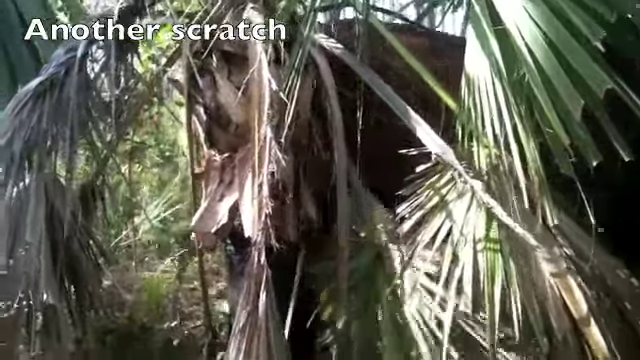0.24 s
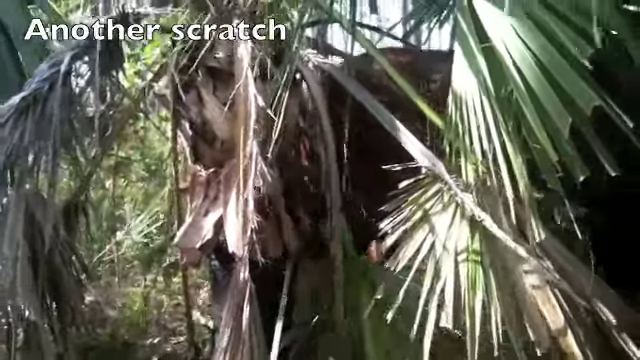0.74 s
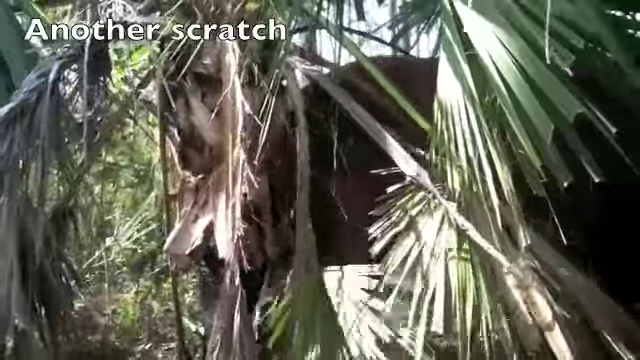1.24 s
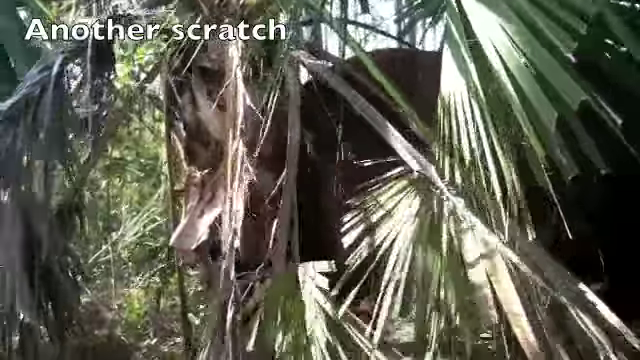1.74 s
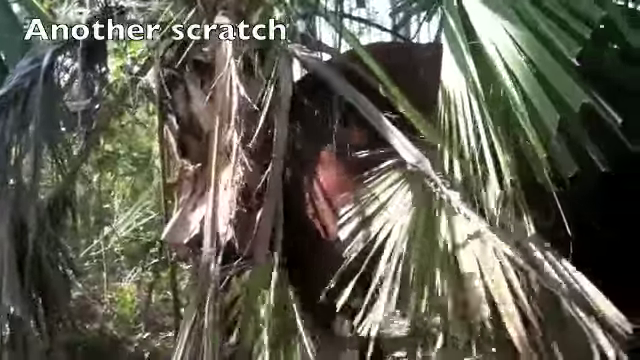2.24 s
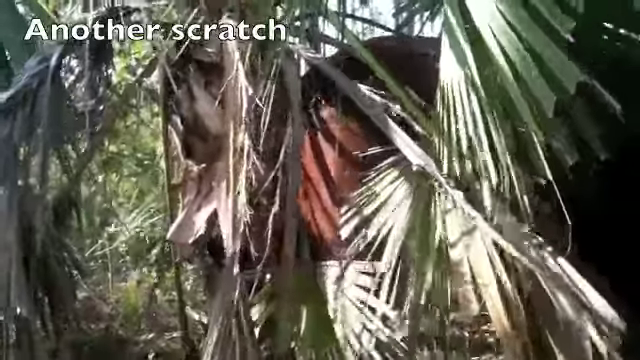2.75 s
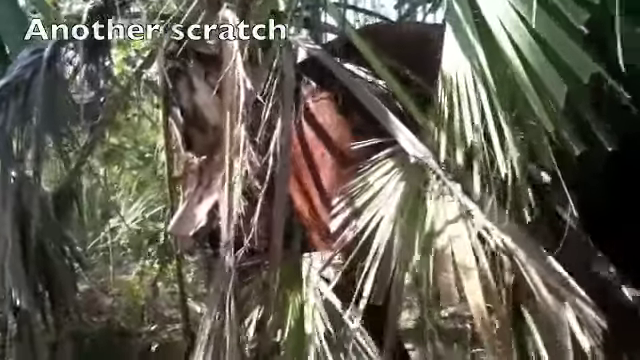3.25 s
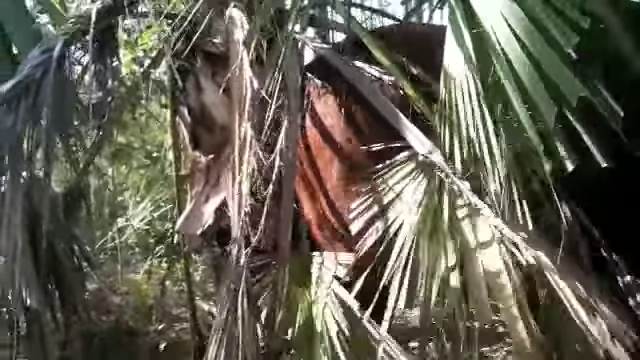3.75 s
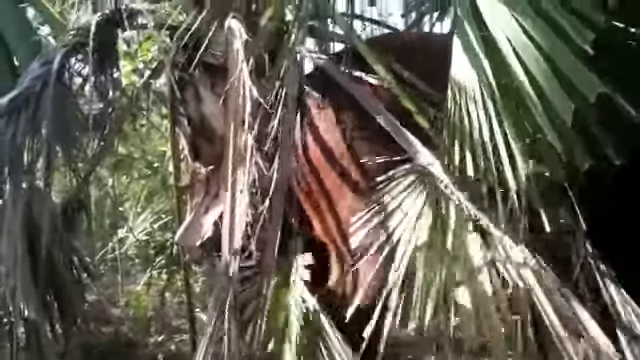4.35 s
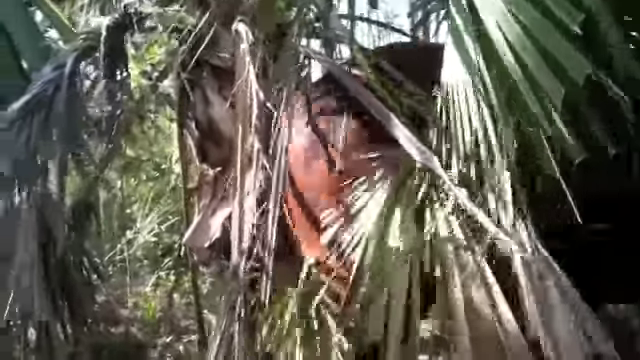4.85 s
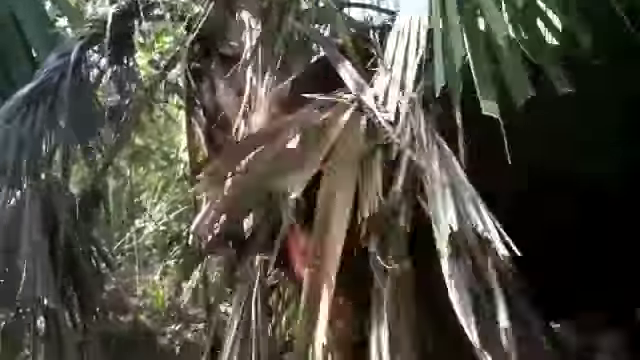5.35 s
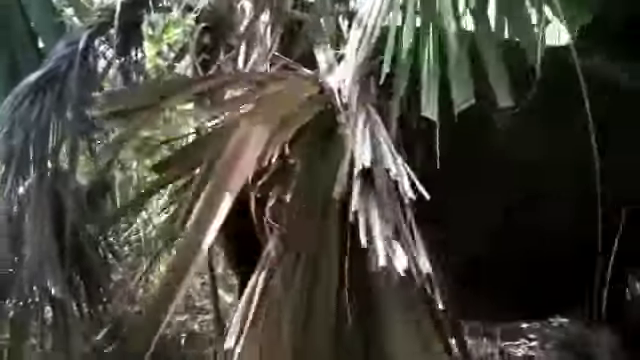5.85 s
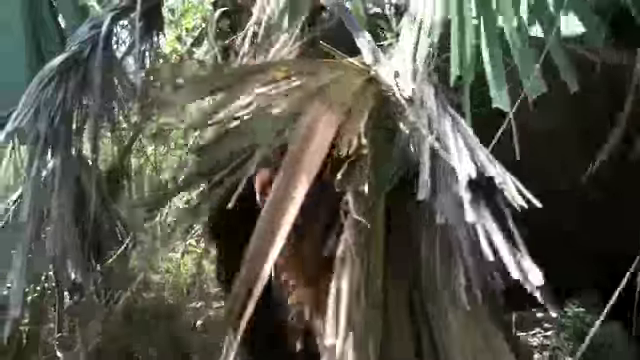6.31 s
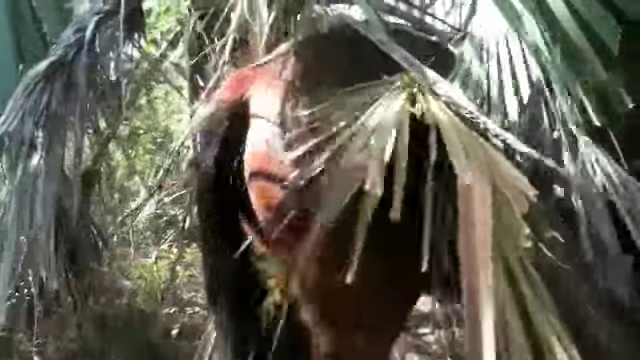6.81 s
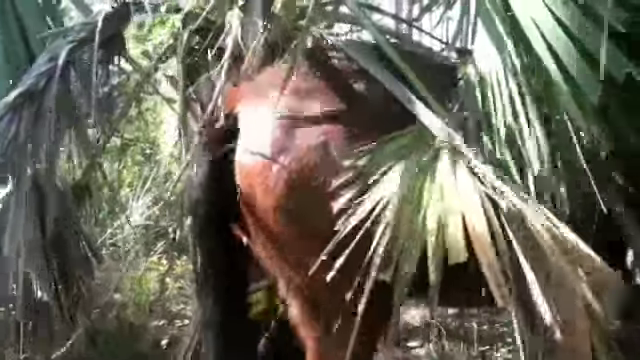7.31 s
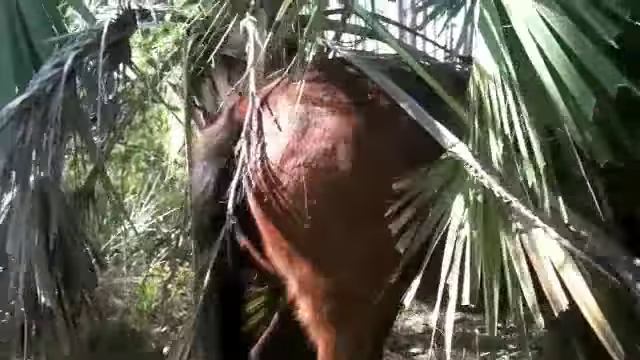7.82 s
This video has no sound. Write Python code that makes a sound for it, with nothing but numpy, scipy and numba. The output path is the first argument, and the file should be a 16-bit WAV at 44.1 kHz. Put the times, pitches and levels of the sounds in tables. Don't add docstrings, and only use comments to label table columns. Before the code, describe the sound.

Brittle palm leaves rustle, tick and snap sharply close by as a heavy animal pushes through them, with occasional dull stalk knocks.

```python
import sys
import numpy as np
from scipy import signal
from scipy.fft import rfft, irfft
from scipy.io import wavfile
from scipy.ndimage import uniform_filter1d
from numba import njit

SR = 44100
rng = np.random.default_rng(int(sys.argv[2]) if len(sys.argv) > 2 else 0)


def store_wav(level_fs):
    pcm = np.round(np.clip(np.atleast_2d(level_fs), -1, 1) * 32767)
    wavfile.write(sys.argv[1], SR, pcm.T.astype(np.int16))


def boost(x):
    u = np.asarray(x, float) / 20
    return 10 ** u


N = 356107


def level(x, db):
    return x * boost(db) / np.sqrt(np.mean(x ** 2))


def shape_db(table, hz):
    table_hz, table_db = np.transpose(table)
    return np.interp(np.log(hz), np.log(table_hz), table_db)


def colour(x, table):
    hz = np.maximum(np.linspace(0, SR / 2, 2049), 1)
    cepstrum = irfft(shape_db(table, hz) * np.log(10) / 20)
    cepstrum[1:2048] *= 2
    cepstrum[2049:] = 0
    impulse = irfft(np.exp(rfft(cepstrum)))
    return signal.fftconvolve(x, impulse)[:N]


@njit
def grains(length, start, hz, cycles, size, rise):
    out = np.zeros(length)
    for k in range(len(start)):
        turn = np.exp((2j * np.pi - np.log(1000.) / cycles[k]) * hz[k] / SR)
        soften = np.exp(-hz[k] / (rise * cycles[k] * SR))
        z, soft = size[k] + 0j, 1.
        end = min(int(start[k] + cycles[k] * SR / hz[k]), length)
        for i in range(max(int(start[k]), 0), end):
            out[i] += z.imag * (1 - soft)
            z, soft = z * turn, soft * soften
    return out


def strike(start_s, hz, cycles, size, rise):
    group = np.broadcast_arrays(np.asarray(start_s) * SR, hz, cycles, size)
    start, hz, cycles, size = [np.array(a, float).ravel() for a in group]
    return grains(N, start, hz, cycles, size, rise)


def random_sign(chance):
    return np.sign(chance - 0.5)


def walk(rate):
    hold = int(SR / rate)
    steps = rng.standard_normal(N // hold + 1)
    return uniform_filter1d(np.repeat(steps, hold), hold)[:N]


def slips(rate, fade_ms):
    kicks = (rng.random(N) < rate / SR) * rng.random(N)
    fade = np.exp(-1000 / (fade_ms * SR))
    saw = np.tanh(signal.lfilter([1], [1, -fade], kicks))
    return (saw - saw.mean()) / saw.std()


# pitch_hz [Hz], level_db [dB per Hz]
AIR_TONE = [(15, -61), (25, -31), (53, -16), (283, 3), (1470, -5), (2450, -3.5), (3210, -13), (4820, -1),
            (7620, -9), (12100, -11.5), (14600, -39), (15800, -55)]
# pitch_hz [Hz], level_db [dB]
CAMERA_WHINE = [
    (14970, -90),
    (15030, -94),
]


def air():
    breath_db = 2.0 * walk(3) + 1.05 * walk(12)
    out = level(colour(rng.standard_normal(N), AIR_TONE) * boost(breath_db), -60)
    t = np.arange(N) / SR
    for hz, db in CAMERA_WHINE:
        out += np.sqrt(2) * boost(db) * np.sin(2 * np.pi * hz * t + 1.5 * walk(30))
    return out


# start_s [s], peak_db [dB], ring_hz [Hz], t60_s (time to fade 60 dB) [s], slap_db [dB]
STALK_KNOCKS = [(0.118, -67, 269, 0.1, -38), (0.167, -39.5, 430, 0.053, -36), (0.221, -41, 309, 0.071, -35),
                (0.369, -45.5, 200, 0.056, -38), (0.616, -38.5, 253, 0.085, -38),
                (1.688, -73, 242, 0.1, -37), (2.581, -48.5, 269, 0.085, -58), (3.238, -56, 252, 0.18, -38),
                (3.414, -65, 493, 0.071, -31), (3.476, -51, 370, 0.062, -56),
                (3.797, -48.5, 305, 0.086, -48), (4.7, -46.5, 159, 0.08, -45),
                (4.772, -47.5, 210, 0.088, -35), (6.4, -52, 290, 0.048, -52), (6.628, -44, 261, 0.083, -38),
                (6.942, -48, 334, 0.066, -26)]


def knocks():
    s, peak_db, hz, t60, slap_db = np.transpose(STALK_KNOCKS)
    start = s + 0.003145
    cycles = t60 * hz
    ring = strike(start, hz, cycles, boost(peak_db + 4.5), 0.046)
    ring += strike(start, 0.654 * hz, 0.9 * cycles, boost(peak_db - 7.5), 0.029)
    ring += strike(start, 1.404 * hz, 1.6 * cycles, boost(peak_db - 3), 0.033)
    trunk_db = peak_db + 10 * np.log2(200 / hz) - 7.0
    ring += strike(start + 0.0055, 0.456 * hz, 0.88 * cycles, boost(trunk_db), 0.14)
    slap = strike(start + 15 / SR, 1400, 2.4, -boost(slap_db + 10.5), 0.093)
    for when, tone in rng.random((5, 2, len(s))):
        slap += strike(start + 150 * when / SR, 650 * 3.1 ** tone, 9.0, boost(slap_db - 1.5), 0.037)
    return ring + signal.sosfilt(signal.butter(2, 260, "highpass", fs=SR, output="sos"), slap)


# start_s [s], peak_db [dB], ring_hz [Hz]
BLADE_PLUCKS = [(0.1206, -35, 2140), (0.168, -37, 1780), (0.2226, -39, 1740), (1.0645, -44, 2850),
                (1.132, -25, 2470), (2.3955, -39.5, 1630), (2.806, -35, 2520), (3.4142, -29, 2300),
                (4.2725, -42, 2480), (4.4877, -31, 2620), (4.7774, -29, 2390), (4.9033, -33, 1740),
                (4.9707, -32, 2520), (5.2101, -29.5, 2060), (5.2659, -33, 2830), (5.3033, -30, 2310),
                (5.3584, -25.5, 2450), (5.3986, -35, 2690), (5.6123, -22, 2150), (5.654, -21, 2610),
                (5.6888, -24, 2620), (5.724, -31, 2570), (5.9654, -24, 3400), (5.971, -33, 3000),
                (6.225, -37, 2620), (6.3185, -36, 3160), (6.613, -28.5, 2330), (6.7979, -36, 1630),
                (6.9441, -37, 2250), (6.998, -28.5, 2370), (7.0359, -32, 2340), (7.1157, -28, 2130),
                (7.1571, -32, 2400), (7.2459, -28, 3300), (7.2457, -25, 2150), (7.3976, -28, 2310),
                (7.5108, -30, 3150), (7.636, -30.5, 2800), (7.6939, -35, 2100), (7.7495, -28, 2260),
                (7.8496, -35, 2700)]


def plucks(count=6):
    s, peak_db, hz = np.transpose(BLADE_PLUCKS)[:, :, None]
    when, tone, softer, sign = rng.random((4, len(s), count))
    flap = np.arange(count)
    late = 0.012 * ((flap + when) / count) ** 1.5
    pitch = hz * (1 + 0.42 * (tone - 0.5) * flap / count)
    size = random_sign(sign) * boost(peak_db - 1.0 - 880 * late - 6.9 * softer)
    return strike(s + late + 0.00047, pitch, 28., size, 0.011)


# start_s [s], peak_db [dB]
TIP_SPLITS = [(0.5945, -35), (1.3768, -31), (1.487, -24), (2.1226, -33), (2.7876, -31), (2.806, -25),
              (2.9407, -28), (3.054, -31), (3.1507, -37), (3.2425, -33), (3.2425, -29), (3.3468, -32),
              (4.2727, -38), (4.3251, -36), (4.577, -32), (4.5887, -17), (4.784, -32), (4.784, -28),
              (4.9317, -28), (5.1462, -29), (5.2091, -28), (5.2096, -21), (5.2415, -27), (5.2659, -25),
              (5.3283, -29), (5.3762, -34), (5.5199, -23), (5.5782, -33), (5.6176, -27), (5.655, -13),
              (5.7573, -17), (5.9643, -31), (6.3185, -38), (6.3704, -33), (6.544, -31), (6.6578, -27),
              (6.8219, -22), (7.0359, -25), (7.1716, -28), (7.244, -22), (7.3228, -26), (7.4081, -26),
              (7.5108, -23), (7.7019, -32), (7.7019, -27), (7.7278, -29), (7.8496, -35), (7.9079, -31),
              (7.9977, -36)]


def splits(count=5):
    s, peak_db = np.transpose(TIP_SPLITS)[:, :, None]
    when, tone, sign = rng.random((3, len(s), count))
    late = 0.0067 * ((np.arange(count) + when) / count) ** 3.2
    size = random_sign(sign) * boost(peak_db - 4.5 - 880 * late)
    return strike(s + late + 0.0003, 8600 + 4600 * tone, 30., size, 0.015)


# peak_s [s], level_db [dB], ring_hz [Hz], blade_db (share of the blade) [dB]
LEAFLET_CRACKS = [(0.157, -22.5, 6200, -12), (.224, -23, 5850, -6), (0.619, -19.5, 7120, -10),
                  (0.806, -30, 6560, -19), (2.096, -36, 6900, -20), (2.124, -29.5, 6800, -25),
                  (2.808, -21.5, 7300, -26), (2.943, -18, 6250, -15), (3.146, -20, 6010, -32),
                  (3.3985, -22.5, 6440, -30), (2.477, -30, 6900, -22), (3.495, -29.5, 5640, -3),
                  (4.3269, -20.5, 6650, -23), (4.5911, -18, 7470, -8), (5.2109, -20, 6400, -8),
                  (7.511, -24, 6020, -22), (5.2434, -20, 7770, -24), (5.522, -20.5, 5040, -13),
                  (2.7168, -24, 6540, -8.5), (5.7699, -26, 5660, -6), (5.9666, -20, 4730, -19),
                  (6.3190, -22, 7200, -10), (6.5765, -21.5, 5400, -20), (6.8374, -25.5, 5030, -2.5),
                  (6.929, -25, 6160, -4), (7.2476, -11.5, 7050, -8), (7.41, -21, 5880, -7),
                  (7.434, -23, 6400, -4), (7.638, -28.5, 5650, -5), (7.751, -21, 7000, -1.5)]
# peak_s [s], level_db [dB], ring_hz [Hz], blade_db [dB]
LEAFLET_SHAKES = [(0.598, -23.5, 6650, -25), (0.733, -33, 6150, 1), (1.067, -37.5, 6620, 12),
                  (1.1338, -23.5, 6060, -17), (1.353, -24, 6060, -13), (1.382, -21.5, 6850, -6.5),
                  (1.489, -27, 7400, -20), (2.3977, -29.5, 6370, -3.5), (2.7818, -26, 6400, -25),
                  (3.0686, -29.5, 6000, -3), (3.5704, -29.5, 6340, -7), (4.2741, -31, 6400, 3.5),
                  (4.578, -26, 6400, -7), (4.786, -21.5, 6720, -1.5), (4.933, -24, 6800, -19),
                  (5.1493, -27, 6740, -16), (5.199, -29, 6200, -15), (5.2847, -29, 6990, -8),
                  (5.3586, -24, 5420, -7), (5.403, -26.5, 6730, -19), (5.5812, -23, 7350, -27),
                  (5.614, -21.5, 4850, -18), (6.228, -34, 6450, 0), (6.6645, -27, 6500, -18),
                  (6.6957, -28, 6040, -17), (6.745, -25.5, 6900, -31), (6.946, -33, 5910, 7),
                  (7.037, -27.5, 6260, -7), (7.087, -28, 6230, -0.5), (7.324, -20, 7040, -6)]
# peak_s [s], level_db [dB], ring_hz [Hz], swell_ms
# [ms], rattle_ms [ms]
LEAFLET_TEARS = [(0.649, -25, 6550, 12, 20), (2.239, -26, 5370, 9, 12), (2.4266, -27, 6300, 4.1, 14.7),
                 (3.4164, -14, 5900, 2.6, 3.8), (5.6558, -16, 7460, 2.5, 4), (3.18, -23, 5600, 9.9, 22),
                 (3.255, -22.5, 6400, 16.2, 19.3), (3.4772, -23, 6820, 4.7, 6.3),
                 (3.615, -26, 6500, 4.8, 13.6), (4.49, -27, 6000, 25, 17), (4.8086, -21.5, 6400, 11, 19),
                 (4.9051, -16.5, 6430, 6.2, 5.9), (5.332, -24.5, 5300, 5.2, 7.1),
                 (5.692, -21, 6400, 7.5, 9), (5.7595, -17.5, 5400, 9, 4.1), (6.078, -36, 6750, 12, 11.4),
                 (6.2042, -29.5, 7100, 12.7, 20.4), (6.2634, -29.5, 5000, 10, 12),
                 (6.3777, -27.5, 6000, 4.8, 6.6), (6.616, -24.5, 5940, 4.5, 12),
                 (6.803, -21.5, 5000, 6.3, 3.4), (6.86, -24.5, 6400, 6.4, 8.9),
                 (7.123, -20, 6000, 6.2, 5.5), (7.1757, -19, 7140, 4.2, 19), (5.222, -20, 7700, 1.9, 2.8),
                 (7.7032, -18.5, 7100, 6.4, 6), (7.7374, -28.5, 6230, 11.6, 24),
                 (7.852, -28.5, 5750, 3.8, 2.9), (7.909, -30, 7140, 1.8, 7), (7.9547, -28, 6400, 5, 9)]
# peak_s [s], level_db [dB]
TIP_TICKS = [(0.0412, -30.5), (0.98, -33), (1.28, -30), (1.5307, -36), (2.19, -36), (2.4366, -39),
             (3.0305, -34.5), (3.2618, -19), (3.435, -26), (3.992, -42), (4.094, -32), (4.352, -28),
             (4.3793, -25.5), (5.258, -33), (5.7775, -30), (5.2678, -31), (6.0425, -43), (5.553, -34),
             (5.5989, -26), (6.163, -34), (6.8244, -36), (7.015, -24.5), (7.158, -32), (7.194, -26),
             (7.49, -31), (7.9986, -47)]
# peak_s [s], level_db [dB], ring_hz [Hz]
LEAFLET_FLICKS = [(0.168, -35, 6530), (0.2918, -32, 7510), (0.4525, -33, 5790), (0.611, -29, 7340),
                  (0.7453, -35, 5950), (0.7594, -24.5, 6160), (0.97, -33, 6050), (1.094, -32, 6580),
                  (1.1557, -27, 5930), (1.429, -25.0, 7410), (1.5031, -34, 5960), (1.5164, -35, 6630),
                  (1.6912, -33, 5740), (1.857, -37, 6540), (2.0283, -36, 6080), (2.113, -39, 5470),
                  (2.585, -30, 7110), (3.199, -33, 5000), (3.2376, -22, 6030), (3.3568, -22, 5540),
                  (3.4493, -25, 5800), (3.509, -33, 6050), (3.6506, -45, 5920), (3.7134, -38, 7400),
                  (3.899, -41, 8240), (3.946, -45, 5730), (3.962, -37, 5330), (4.2039, -42, 4880),
                  (4.307, -29, 5670), (4.508, -28, 7320), (4.7754, -27, 6270), (4.836, -26.0, 6810),
                  (4.8725, -27, 5660), (4.884, -25.0, 6370), (5.0281, -29, 6700), (5.1608, -34, 6450),
                  (5.3034, -27, 7820), (5.3778, -26.5, 8100), (5.6238, -23.5, 7060), (5.8387, -33.5, 7390),
                  (5.9096, -35, 5200), (5.929, -38, 5870), (5.9753, -24, 4500), (6.196, -35, 6570),
                  (6.3017, -34.5, 4000), (6.4704, -38, 6220), (6.5164, -31, 6800), (6.593, -31, 6660),
                  (6.7573, -44, 6560), (7.0013, -27, 6850), (7.0585, -26, 6010), (7.345, -22.0, 5670),
                  (7.4246, -25.0, 6800), (7.5548, -34, 6820), (7.6661, -36, 6170), (7.715, -30, 6870),
                  (7.7863, -38, 8320), (7.869, -37, 6120), (7.9447, -31, 6760), (7.9675, -36.0, 6540)]


def breaks():
    crack_swell_ms = 2.6
    rows = []
    for s, db, hz, blade_db in LEAFLET_CRACKS:
        rows.append((s, db, hz, blade_db, crack_swell_ms, 9 * (6500 / hz) ** 1.1))
    for s, db, hz, blade_db in LEAFLET_SHAKES:
        rows.append((s, db, hz, blade_db, 4.6, 16))
    for s, db, hz, swell_ms, rattle_ms in LEAFLET_TEARS:
        rows.append((s, db, hz, -10.5, swell_ms, rattle_ms))
    for s, db in TIP_TICKS:
        rows.append((s, db, 6160, -19, crack_swell_ms, 7))
    for s, db, hz in LEAFLET_FLICKS:
        rows.append((s, db, hz, -6.5, 5, 6))
    return rows


# pitch_hz [Hz], level_db [dB per Hz]
LEAFLET_TONE = [(65, -44.5), (110, -20.5), (263, -10.5), (345, -9.5), (399, -15.5), (729, -10.5),
                (897, -9.5), (1570, -13), (2430, -5.5), (3250, -8.5), (5820, -4.5), (7950, -4), (9790, -4),
                (12100, -13), (15800, -32)]


def snaps(count=72, splinters=7):
    s, peak_db, hz, blade_db, swell, rattle = np.transpose(breaks())[:, :, None]
    swell, rattle = np.clip(swell - 2.4, 0.05, 30), np.clip(rattle, 2, 21)
    when, tone, softer, spread, sign, crack_when, crack_tone = rng.random((7, len(s), count))
    sign = random_sign(sign)
    span = swell + 2.2 * rattle
    late = span * ((np.arange(count) + when) / count) ** 1.4 - swell
    size_db = peak_db + 10 * np.log10(span / count) + 7.5 - 15 * softer
    size_db -= np.where(late < 0, -7 * late / (swell + 0.11), 9 * late / rattle)
    start = s + (late - 1.1) / 1000
    pitch = np.clip(hz * 2 ** (2.34 * (tone - 0.42) * spread), 400, 15000)
    own_tone_db = shape_db(LEAFLET_TONE, hz)
    size = sign * boost(size_db - np.maximum(own_tone_db, shape_db(LEAFLET_TONE, pitch)))
    bright = strike(start, pitch, 20., size, 0.015)

    crack_when, crack_tone = crack_when[:, :splinters], crack_tone[:, :splinters]
    climb = ((np.arange(splinters) + crack_tone) / splinters) ** 1.7
    crack_hz = 0.908 * hz + (15000 - 0.81 * hz) * climb
    crack_db = peak_db + 0.3 + 9 * np.log2(hz / 7000) - 0.73 * swell
    crack_db = crack_db + (2.0 + 25 * np.log2(hz / 6600)) * np.log2(crack_hz / 6000)
    crack_at = s + (1.5 * crack_when - 1.15) / 1000
    bright += strike(crack_at, crack_hz, crack_hz / 330, sign[:, :splinters] * boost(crack_db), 0.083)

    own_hz = hz * (1 + 0.3 * (tone[:, :3] - 0.5))
    own_at = s + (3.0 * softer[:, :3] - 1.2) / 1000
    own_size = sign[:, :3] * boost(peak_db - 13.0 - own_tone_db)
    bright += strike(own_at, own_hz, own_hz * 0.015, own_size, 0.018)

    blade_hz = 800 * 3.72 ** spread[:, ::3] ** 0.65
    blade_size = (sign * boost(size_db + blade_db - 9.5))[:, ::3]
    low = strike(start[:, ::3], blade_hz, 11., blade_size, 0.018)
    return colour(bright, LEAFLET_TONE) + low


# time_s [s], scrape_db [dB]
FLANK_LEAN = [(0.0, -42), (0.3, -44.5), (0.78, -41.5), (0.9, -46), (1.5, -52), (1.75, -50.5), (2.11, -52),
              (2.3, -42.5), (2.78, -42.5), (2.9, -68), (3.5, -62), (3.93, -54.5), (4.74, -40.5), (5.5, -39),
              (5.9, -50.5), (6.9, -40), (7.6, -40), (7.85, -66)]
# start_s [s], hold_s [s], scrape_db [dB],
# blade_db (blade rattle against the scrape) [dB], load_db (extra load on the stalks) [dB]
RUB_STROKES = [(0.14, 0.19, -41, -14, -1), (0.365, 0.16, -39, -5.5, 1), (0.62, 0.13, -39.5, -7, 0.5),
               (1.061, 0.12, -36, -4, -0.5), (1.195, 0.25, -39, -9, 0.5), (1.372, 0.18, -37, -7.5, -1),
               (1.692, 0.008, -44, -3, -2), (2.807, 0.017, -44, -7.5, -1.5), (2.943, .005, -46, -12, 1.5),
               (3.077, 0.053, -41, -10, -2), (3.179, 0.24, -33.5, -10, -3), (3.562, 0.27, -45.5, -9, -2),
               (4.11, 0.032, -47, -14, -1), (4.33, 0.043, -36.5, -7, 1), (4.452, 0.061, -35.5, -2.5, 1.5),
               (4.798, 0.22, -38, -8, 2.5), (5.027, 0.079, -42.5, -11, 2), (5.236, 0.15, -48, -6, -6),
               (5.63, 0.03, -32, -5.5, -8), (5.684, 0.069, -43, -19, -2), (5.983, 0.0089, -48, -10, 6),
               (6.515, 0.19, -40, -7, -2.5), (7.175, 0.069, -40, -2, 2), (7.26, 0.095, -30.5, -2.5, 1),
               (7.414, 0.047, -40.5, -6, 3.5), (7.704, 0.043, -39.5, -4, 1), (7.888, 0.15, -47.5, -4.5, -7),
               (0.983, 0.018, -47.5, -20, 0), (6.19, 0.093, -52.5, 2.5, 5), (2.562, 0.03, -41.5, -12, 0)]


def rubbing():
    rise_db_s, fall_db_s, lean_blade_db = 240, 147, -6
    t = np.arange(N) / SR
    leaf = boost(np.interp(t, *np.transpose(FLANK_LEAN))) ** 2
    blade = leaf * boost(lean_blade_db) ** 2
    stalk = leaf
    for s, hold, db, blade_db, load_db in RUB_STROKES:
        rise_db = rise_db_s * np.clip(s - t, 0, 1)
        fall_db = fall_db_s * np.clip(t - s - hold, 0, 1)
        power = boost(db - rise_db - fall_db) ** 2
        leaf = leaf + power
        blade = blade + power * boost(blade_db) ** 2
        stalk = stalk + power * boost(load_db) ** 2
    scrape_db = 10 * np.log10(leaf)
    effort_db = scrape_db + 40
    stalk_db = -15.5 - 0.14 * effort_db + 10 * np.log10(stalk / leaf)
    tip_db = -13.5 + 0.067 * effort_db
    return scrape_db, 10 * np.log10(blade / leaf), stalk_db, tip_db


# time_s [s], rustle_hz (centre of their rustle) [Hz]
LEAFLET_WIDTH = [(0.0, 6400), (0.45, 5630), (0.75, 6460), (1.15, 6400), (1.5, 6550), (2.2, 6100),
                 (2.56, 6700), (3.15, 5900), (3.42, 6400), (4.3, 6500), (4.9, 6300), (5.3, 6500),
                 (5.6, 6700), (5.98, 5500), (6.2, 6200), (6.6, 6700), (7.3, 6750), (8.07, 6940)]


def ticks(db, lo_hz, hi_hz, cycles, spread_db, surge_db, count, leaning=0):
    middle_hz, tilt_db = 6400, 22
    when, pitch, strength, ring, sign = rng.random((count, 5)).T
    hz = lo_hz + pitch * (hi_hz - lo_hz)
    ring = cycles * (0.5 + ring)
    narrow = np.log2(np.interp(when * N / SR, *np.transpose(LEAFLET_WIDTH)) / middle_hz)
    size_db = leaning * tilt_db * narrow * np.log2(hz / middle_hz) - spread_db * np.log(1 - strength)
    size = random_sign(sign) * boost(size_db) * np.sqrt(hz / ring)
    swarm = grains(N, when * N, hz, ring, size, 0.037)
    surge = boost(surge_db * (walk(25) + walk(90)))
    return level(colour(swarm, LEAFLET_TONE) * surge, 0) * boost(db)


def crackle():
    scrape, blade = rubbing()[:2]
    stiff = ticks(scrape - 6.0, 4993, 8030, cycles=80, spread_db=1.8, surge_db=1.5, count=6000, leaning=1.2)
    wide = ticks(scrape + blade - 12.0, 899, 2905, cycles=36, spread_db=1.76, surge_db=1.5, count=3000)
    hairline = ticks(scrape - 11.0, 4000, 11000, cycles=3.0, spread_db=2.2, surge_db=1.0, count=2500)
    return stiff + wide + hairline


# time_s [s], jerk_share [0 to 1]
GRIP_JERK = [
    (0, 0.25),
    (1.6, 0.25),
    (2.4, 0.4),
    (4.5, 0.3),
    (5.3, 0.55),
    (8.07, 0.5),
]


def rustle():
    scrape, blade, stalk, tip = rubbing()
    grip = 0.5 * walk(15) + 1.6 * slips(70, 10) + 1.3 * walk(120)
    grip = grip * np.interp(np.arange(N) / SR, *np.transpose(GRIP_JERK))
    leaflets = ticks(scrape + grip - 3.0, 4020, 8450, cycles=11.2,
                     spread_db=0.5, surge_db=1.6, count=60000, leaning=0.79)
    blades = ticks(scrape + blade + 0.89 * grip - 6.0, 1400, 3990, cycles=23,
                   spread_db=1.5, surge_db=1.5, count=20000)
    stalks = ticks(scrape + stalk + 0.26 * grip - 2.0, 127.0, 1554, cycles=15.2,
                   spread_db=1.2, surge_db=1.66, count=9000)
    tips = ticks(scrape + tip + grip - 0.5, 10000, 15400, cycles=12.3,
                 spread_db=-0.5, surge_db=0.5, count=40000, leaning=0.72)
    return leaflets + blades + stalks + tips


def scene():
    mix = air() + knocks() + plucks() + splits() + snaps() + crackle() + rustle()
    return mix[None]


def roll_off(x):
    return signal.sosfilt(signal.butter(12, 15940, fs=SR, output="sos"), x)


def record(dry):
    dip_hz, dip_width_hz, dip_share = 3150, 740, 0.2
    thin = signal.sosfilt(signal.butter(1, 60, "highpass", fs=SR, output="sos"), dry)
    band = signal.lfilter(*signal.iirpeak(dip_hz, dip_hz / dip_width_hz, fs=SR), thin)
    top_limit = signal.ellip(8, 0.2, 60, 15800, fs=SR, output="sos")
    mix = signal.sosfilt(top_limit, thin - dip_share * band)
    return roll_off(mix)


dry = scene()
out = record(dry)
store_wav(out)
```